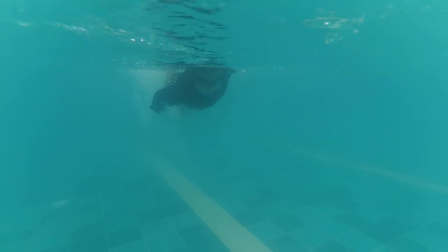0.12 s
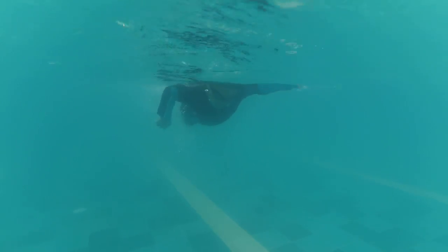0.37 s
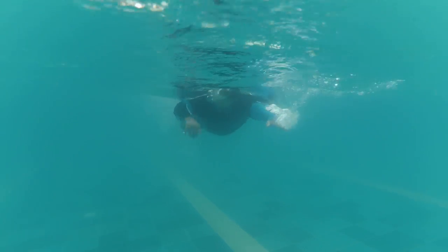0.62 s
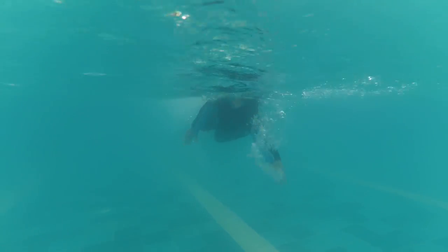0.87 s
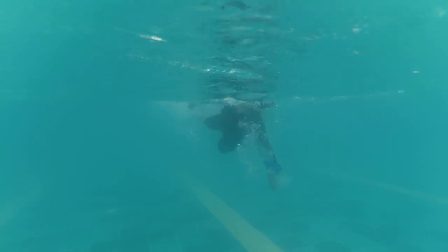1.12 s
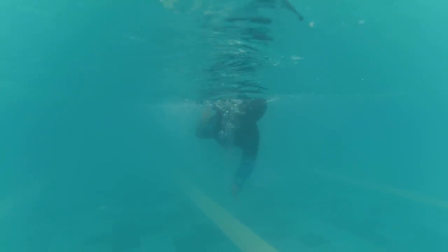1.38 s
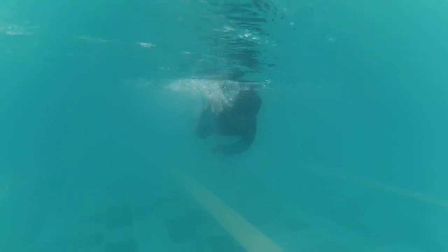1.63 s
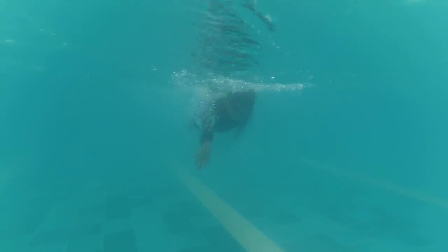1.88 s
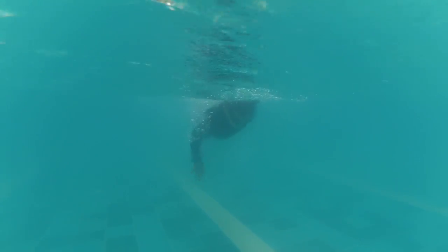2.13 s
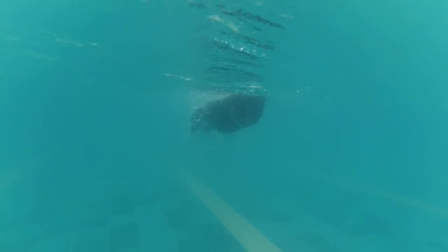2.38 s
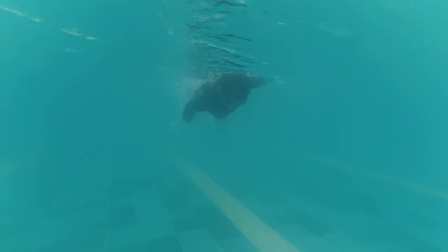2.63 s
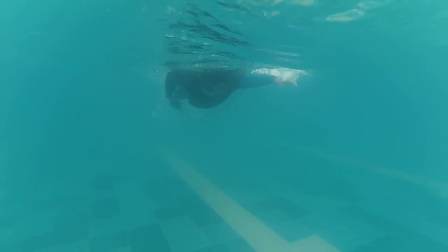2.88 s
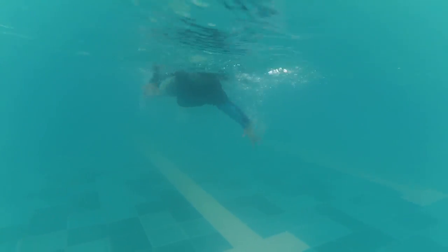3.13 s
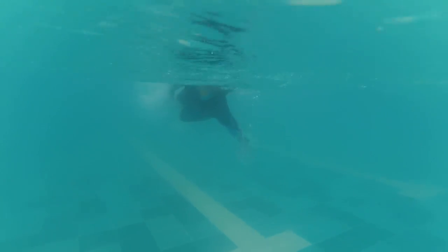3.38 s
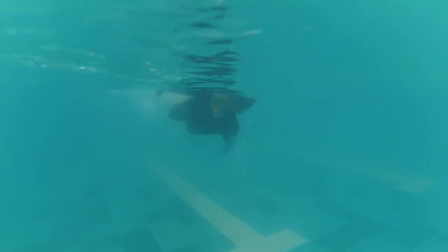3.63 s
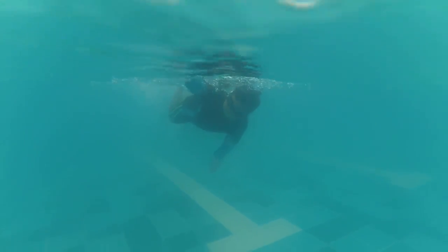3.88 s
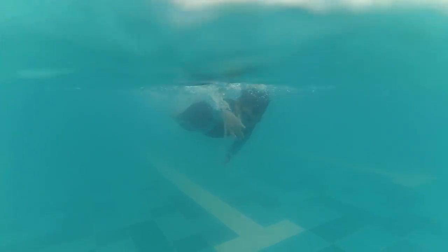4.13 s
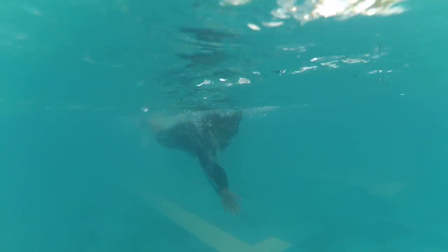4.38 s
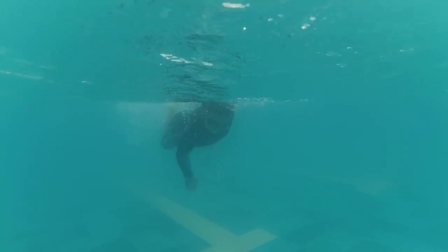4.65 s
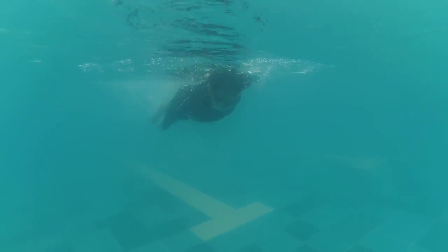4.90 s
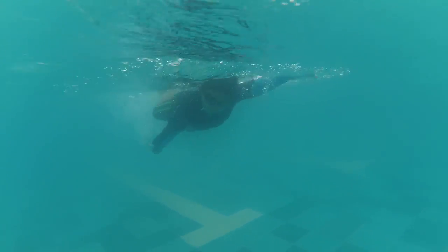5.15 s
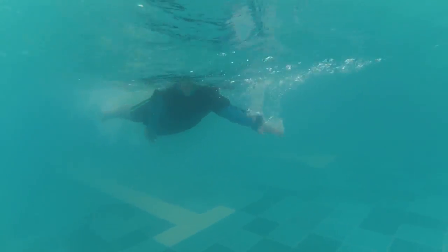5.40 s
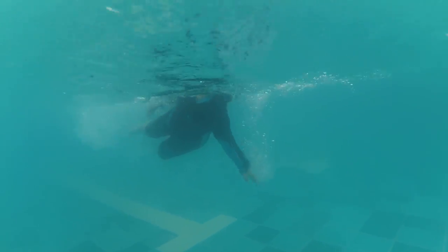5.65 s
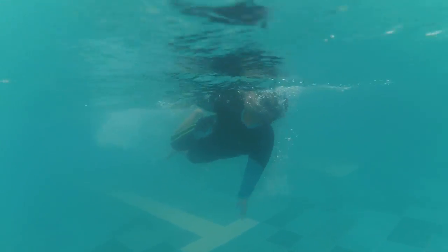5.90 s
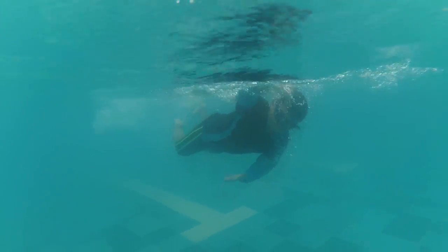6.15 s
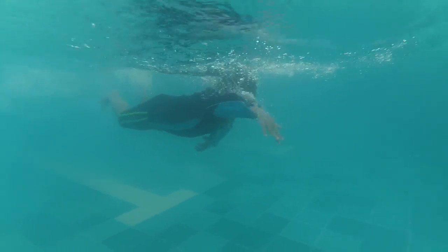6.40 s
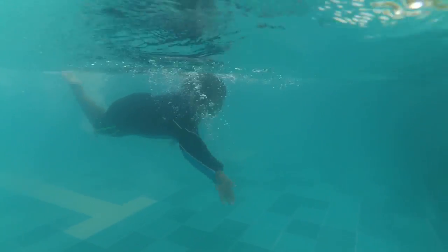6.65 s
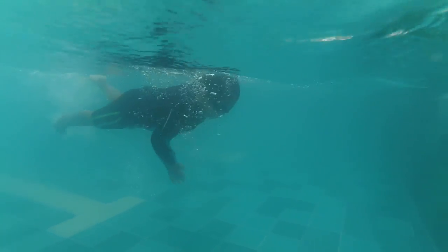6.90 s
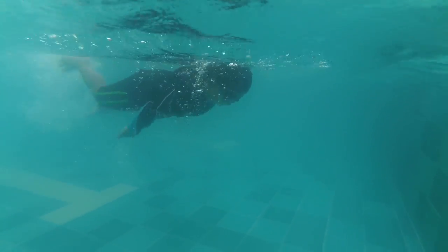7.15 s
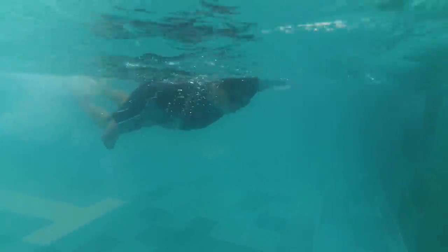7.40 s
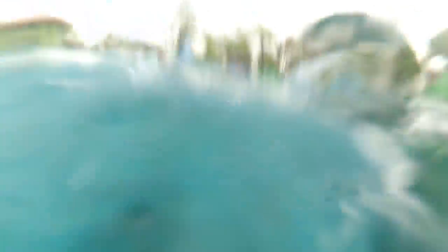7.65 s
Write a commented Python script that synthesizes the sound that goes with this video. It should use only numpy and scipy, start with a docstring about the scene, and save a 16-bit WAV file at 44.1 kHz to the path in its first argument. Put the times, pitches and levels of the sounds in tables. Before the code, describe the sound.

A swimmer passes an underwater microphone sealed in a plastic case in a pool. Dull, boxy water churning, faint hiss and low swaying rumble run throughout. Early on there are sparse clicks and small squeaks. Around the middle the churning swells, fine bubbles crackle and air glugs upward in pitch. Clicks then crowd together, a wave thumps the case, and splashes cluster before it settles to churning with occasional clicks and squeaks.

```python
"""Under water in a pool, a microphone sits in a camera's waterproof case as a swimmer passes close by.
Churned water (noise and ringing bubbles), hiss and the sway of the case run throughout.
Clicks and a few squeaks (stick-slip pulses) come early. From 3.2 s the churning swells, tiny bubbles crackle
and a leaking air pocket glugs upward in pitch. At 4.4-4.7 s clicks crowd together, a wave shoves the case
at 4.8 s, and splashes (noise puffs) crowd 5.2-5.6 s. Squeaks and clicks go on, with a faint whine at 6.9 s."""
import sys
import numpy as np
from scipy import signal
from scipy.fft import rfft, irfft
from scipy.io import wavfile
from scipy.ndimage import uniform_filter1d

SR = 44100
rng = np.random.default_rng(int(sys.argv[2]) if len(sys.argv) > 2 else 0)


def invert_db(level):
    """Linear amplitude ratio for a level in decibels (20 dB per decade), elementwise."""
    return 10 ** (np.asarray(level, dtype=float) / 20)


def waveform_to_disk(signal):
    """Save audio, clipped to [-1, 1], as 16-bit WAV at the path in sys.argv[1]."""
    frames = np.transpose(np.atleast_2d(signal))
    scaled = np.clip(frames, -1, 1) * 32767
    samples = np.round(scaled).astype(np.int16)
    wavfile.write(sys.argv[1], SR, samples)


N = 342657  # samples


def evened(x):
    """Scales a signal to an RMS of 1."""
    return x / np.sqrt(np.mean(x ** 2) + 1e-20)


def read(points, hz):
    """Reads a frequency curve, interpolated along log frequency."""
    f, value = np.transpose(points)
    return np.interp(np.log(hz + 1), np.log(f + 1), value)


def curves(table, t):
    """Reads each column of a timed table at times t."""
    s, *columns = np.transpose(table)
    return [np.interp(t, s, c) for c in columns]


def add(mix, s, sound):
    """Adds a sound to the mix from s seconds, cut at the end of the mix."""
    part = mix[round(s * SR):][:len(sound)]
    part += sound[:len(part)]


def coloured(points):
    """Noise with a given spectrum, at an RMS of 1."""
    hz = np.fft.rfftfreq(N, 1 / SR)
    return evened(irfft(rfft(rng.standard_normal(N)) * invert_db(read(points, hz)), N))


# wall resonances of the case around the microphone: (centre [Hz], width [Hz], relative level [dB])
WALL_MODES = [(640, 76, 2.1), (711, 36.6, 3.3), (830, 24, -1.5), (1060, 76, 0), (1315, 68, -5.5),
              (1604, 53, -11), (1894, 94, -8), (2032, 58, -8), (2478, 110, -7), (2720, 142, -5),
              (2980, 93, -10), (3290, 67, -6), (3920, 240, -10), (4634, 60, -20), (5550, 250, -23.5),
              (7520, 300, -23)]
# smooth base response of the wall: (frequency [Hz], relative level [dB])
WALL_BASE = [(200, -33.5), (350, -39), (900, -10), (1500, -33), (3000, -7), (3600, -44), (5000, -27.5),
             (9000, -36), (15000, -34)]


def case_response():
    """Minimum-phase wall response; unit white noise leaves it with unit power below 1.5 kHz."""
    hz = abs(np.fft.fftfreq(8192, 1 / SR))
    power = invert_db(read(WALL_BASE, hz)) ** 2
    for centre, width, db in WALL_MODES:
        power = power + invert_db(db) ** 2 / (1 + (2 * (hz - centre) / width) ** 2) ** 1.024
    log_gain = 0.5 * np.log(power / (power * (hz < 1500)).mean())
    phase = -signal.hilbert(log_gain).imag
    return np.fft.ifft(np.exp(log_gain + 1j * phase)).real[:4096]


def bubbles(per_s=900, spread_db=2.5, cycles=22):
    """Small bubbles of 36 sizes, each ringing with a slight rise; smaller ones come more often."""
    out, t = np.zeros(N), np.arange(3000) / SR
    for hz in np.geomspace(450, 12000, num=36):
        chance = per_s / 36 * hz / 2500 / SR  # per sample
        strength = invert_db(spread_db * np.minimum(rng.exponential(1, N), 4))
        births = (rng.random(N) < chance) * strength
        ring = np.sin(2 * np.pi * hz * t * (1 + 0.0026 * hz * t))
        ring *= np.exp(-t * hz * 3 / cycles) * np.minimum(t * hz / 2, 1)
        out += np.sqrt(hz) * evened(signal.oaconvolve(births, ring)[:N])  # keeps the spectrum flat
    return evened(out)


# water churned by the swimmer, before the wall: (time [s], churning level [dB], brightness [dB])
# small bubbles near the surface lift the brightness of fizz and spray
CHURNING = [(0.0, -65, 1.5), (0.71, -57, 2), (0.95, -59.5, 3.5), (1.34, -69, 1.5), (1.71, -63, 0.5),
            (1.86, -59.5, 1), (2.6, -67.5, 1), (3.35, -55, 4.5), (3.61, -52, -1.5), (3.79, -67, 5.5),
            (4.18, -63.5, 5), (4.61, -57.5, -1.5), (4.91, -60.5, 0), (5.19, -59, 2.5), (5.43, -54.5, 3.5),
            (5.93, -64.5, 3), (6.36, -61, 2.5), (7.08, -62.5, 1), (7.31, -65, 2), (7.77, -64, 6.5)]
SPRAY_FOLLOWS, FIZZ_FOLLOWS = 0.13, 0.57  # share of the churning swell, in dB, that each takes part in


def churn(patchy_db=1.5, streaky_db=2.0, flicker_db=1.5, bubble_share=0.2):
    """Broad noise and small bubbles in patches and lingering streaks; fizz and spray swell in part."""
    drive = np.sqrt(1 - bubble_share) * rng.standard_normal(N) + np.sqrt(bubble_share) * bubbles()
    hz, t, z = signal.stft(drive, SR, nperseg=512, noverlap=384)
    a, b = rng.standard_normal(z.T.shape + (2,)).T
    patches = evened(uniform_filter1d(uniform_filter1d(a, size=6, axis=0), size=12, axis=1))
    streaks = uniform_filter1d(uniform_filter1d(b, size=60, axis=1), size=60, axis=1)
    streaks = evened(streaks - uniform_filter1d(streaks, size=9, axis=0))  # neighbours trade level
    flicker = evened(uniform_filter1d(rng.standard_normal(len(t)), size=8))
    churn_db, bright_db = curves(CHURNING, t)
    follow_points = [(1300, 1), (1700, FIZZ_FOLLOWS), (4300, FIZZ_FOLLOWS), (5300, SPRAY_FOLLOWS)]
    follows = read(follow_points, hz)[:, None]
    high = read([(1300, 0), (1700, 1)], hz)[:, None]
    usual_db = np.median(churn_db)
    field_db = usual_db + follows * (churn_db - usual_db) + high * bright_db
    field_db += patchy_db * patches + streaky_db * streaks + flicker_db * flicker
    return signal.istft(z * invert_db(field_db), nperseg=512, noverlap=384)[1][:N]


# the case moving in the water: (time [s], slow sway level [dB], flow level before lumps [dB])
CASE_MOTION = [(0.05, -41, -68.5), (0.61, -40, -63), (0.77, -47, -70), (0.92, -43.5, -62), (1.39, -45, -74),
               (1.48, -39.5, -69), (2.25, -45, -69), (2.76, -39.5, -67.5), (2.91, -50, -67),
               (3.49, -34, -55), (4.11, -43.5, -69.5), (4.69, -28, -40.5), (4.73, -36, -58),
               (4.83, -18.5, -54), (5.07, -28, -60.5), (5.24, -33.5, -46), (5.37, -47, -57),
               (5.41, -34, -40.5), (5.56, -32.5, -69.5), (6.16, -29, -67), (6.2, -23, -65),
               (6.76, -33, -68.5), (7.66, -38, -67.5), (7.72, -31, -61)]
# spectra of sway, throb and buffeting: (frequency [Hz], relative level [dB])
SWAY_SPECTRUM = [(1, -5), (3, -3), (6, 0), (11, -4), (14, -10), (18, -18), (24, -40), (40, -90)]
THROB_SPECTRUM = [(10, -40), (18, -2), (22, 0), (33, -4), (45, -14), (60, -26), (100, -70)]
BUFFET_SPECTRUM = [(35, -36), (60, 6.5), (120, -1), (185, -2), (230, -13.5), (400, -18.5), (700, -42.5)]
# one wave shoves the case: (time [s], width [s], level [dB], frequency [Hz])
SHOVE = (4.832, .045, -16, 8)
# throb level [dB] at average motion, and its share of the dB swings of sway and of flow
THROB_DB, THROB_SWAY, THROB_FLOW = -53.5, 0.77, 0.18


def motion(lumpy_db=5.0):
    """Waves rock the case slowly and one shoves it; it throbs, and eddies buffet it in low lumps."""
    t = np.arange(N) / SR
    sway_db, flow_db = curves(CASE_MOTION, t)
    throb_db = THROB_DB + THROB_SWAY * (sway_db - sway_db.mean())
    throb_db += THROB_FLOW * (flow_db - flow_db.mean())
    lumps = evened(uniform_filter1d(uniform_filter1d(rng.standard_normal(N), size=2000), size=2000))
    s, width, db, hz = SHOVE
    surge = invert_db(db) * np.exp(-((t - s) / width) ** 2) * np.sin(2 * np.pi * hz * (t - s))
    rocking = invert_db(sway_db) * coloured(SWAY_SPECTRUM) + surge
    throb = invert_db(throb_db) * coloured(THROB_SPECTRUM)
    buffeting = invert_db(flow_db + lumpy_db * lumps) * coloured(BUFFET_SPECTRUM)
    return rocking + throb + buffeting


# a faint thin tone: (time [s], length [s], level [dB], start frequency [Hz], end frequency [Hz])
THIN_TONE = (6.92, .17, -72, 7750, 8060)


def whine():
    """A faint high tone that slides up and settles."""
    s, length, db, start_hz, end_hz = THIN_TONE
    out, n = np.zeros(N), round(length * SR)
    hz = end_hz + (start_hz - end_hz) * np.exp(-np.linspace(0, 5, n))
    tone = np.sin(2 * np.pi * np.cumsum(hz) / SR)
    add(out, s, invert_db(db) * np.hanning(n) ** 0.077 * tone)
    return out


# showers of tiny bubbles bursting on the case:
# (time [s], length [s], level before spread, tilt and wall [dB], rate [bursts per s])
SHOWERS = [(0.238, 0.052, -72, 130), (3.24, .32, -66.5, 700), (4.42, 0.3, -62, 660),
           (5.204, 0.056, -59, 900), (5.353, 0.19, -60, 950)]


def crackle(wall, spread_db=2.5, cycles=9, tilt=0.8):
    """Sparse bursts of uneven size ring a few cycles at one of 12 pitches, heard through the wall."""
    t, level, rate = np.arange(N) / SR, np.zeros(N), np.zeros(N)
    for s, length, db, per_s in SHOWERS:
        inside = (t > s) & (t < s + length)
        level = level + inside * invert_db(db) * np.sqrt(SR / per_s)
        rate = rate + inside * per_s
    out, u = np.zeros(N), t[:600]
    for hz in np.geomspace(1200, 8000, num=12):
        strength = invert_db(spread_db * np.minimum(rng.exponential(1, N), 3))
        births = (rng.random(N) < rate / 12 / SR) * strength
        ring = np.exp(-u * hz * 3 / cycles) * np.sin(2 * np.pi * hz * u)
        ring /= np.linalg.norm(ring)
        out += (hz / 2500) ** tilt * signal.oaconvolve(births * level, ring)[:N]
    return signal.oaconvolve(out, wall)[:N]


# wet skin squeaking on the case:
# (time [s], length [s], level after the wall [dB], slip rate [Hz], harmonic the contact favours [number])
RUBS = [(0.908, .12, -46, 812.4, 2.73), (2.238, 0.019, -57, 1070, 0.84), (2.562, 0.12, -58, 618, 3.2),
        (2.851, 0.11, -51, 651, 2.9), (5.181, 0.13, -45, 1070, 2.14), (5.258, .05, -59, 1105, 4.3),
        (5.565, 0.092, -41.5, 1110, 5.16), (6.088, 0.099, -53, 1114, 4.2), (6.492, 0.079, -55, 1067, 4)]
SLIP_SAG, SLIP_UNEVEN = 0.015, 0.016  # shares of the slip rate: fall over a squeak, random waver


def squeaks(wall, flutter_db=4.0, favour_db=9):
    """Stick-slip pulses at a wavering rate: nine fluttering harmonics coloured by the wall."""
    out, k = np.zeros(N), np.arange(1, 10)[:, None]
    noises = rng.standard_normal((len(RUBS), 10, SR // 4))
    for (s, length, db, hz, favoured), noise in zip(RUBS, noises):
        n = round(length * SR)
        wander = uniform_filter1d(noise, size=200)[:, :n] * np.sqrt(200)
        rate = hz * (1 + SLIP_SAG * np.linspace(0.5, -0.5, n) + SLIP_UNEVEN * wander[0])
        turns = np.cumsum(rate) / SR
        harmonic_db = favour_db * np.exp(-(k - favoured) ** 2) + flutter_db * wander[1:]
        slips = (invert_db(harmonic_db) * np.cos(2 * np.pi * k * turns + k ** 2)).sum(0)
        swell = np.sin(np.pi * np.linspace(0, 1, n) ** 0.5) ** 1.53
        rubbed = signal.fftconvolve(slips * swell, wall)
        add(out, s, invert_db(db) * rubbed / np.sqrt(np.sum(rubbed ** 2) / n))
    return out


# clicks that ring a bubble or the wall: (time [s], ring level [dB], ring frequency [Hz],
# ring time to -60 dB [s], crack level relative to ring, before a 5 dB cut [dB])
CLICK_EVENTS = [(0.27, -41, 5270, 0.0092, -10), (0.2793, -31.5, 2920, 0.014, -3),
                (0.3909, -41.5, 4230, .012, -11), (0.747, -44.5, 2810, 0.085, -8),
                (1.407, -43, 490, 0.019, 4.5), (1.9614, -45.5, 2070, .047, -20),
                (1.98, -51.5, 690, 0.068, -13), (2.341, -41, 583, 0.006, -6.5),
                (2.3415, -40.5, 4130, .012, -10), (2.644, -43, 735, 0.071, -27),
                (3.134, -48, 2530, .022, 0), (3.225, -42, 1410, 0.039, -12), (3.259, -43, 726, 0.0092, 1),
                (3.351, -36.5, 1160, 0.02, -39), (3.5685, -38, 1950, .026, -16),
                (3.769, -37, 1140, .022, -11), (3.7853, -39.5, 2720, .029, -13),
                (3.8034, -35, 3780, 0.02, -19), (3.9546, -42, 4120, 0.014, -10),
                (4.231, -50, 450, 0.02, 10), (4.274, -37, 1060, 0.037, 4), (4.3602, -41.5, 2500, .018, -21),
                (4.3919, -47, 2130, 0.025, -16), (4.468, -54, 7400, .0092, 2), (4.492, -47, 5840, .0089, 2),
                (4.5161, -34.5, 2960, 0.015, -4), (4.544, -27.5, 1070, 0.057, -3.5),
                (4.5653, -39, 5600, .0092, -1), (4.575, -37, 5170, .01, 0), (4.609, -38, 900, .015, -7),
                (4.618, -34, 900, 0.011, -6), (4.628, -26.5, 1000, 0.01, -25),
                (4.6418, -23.5, 2544, 0.041, -3.5), (4.649, -29, 690, .04, -12),
                (4.667, -26, 940, 0.028, -15), (4.685, -30.5, 1000, 0.016, -10),
                (4.9117, -22, 2960, 0.025, -14.5), (5.9044, -36, 2770, .031, -6.5),
                (5.9557, -41.5, 2700, 0.052, -12), (6.133, -49, 4300, 0.016, -15),
                (6.6443, -46.5, 2660, .034, -39), (6.6707, -42.5, 2850, .035, -39),
                (7.0423, -41.5, 2810, .032, -12), (7.137, -46, 684, 0.13, -22),
                (7.3108, -42, 4100, 0.012, -6), (7.3418, -49, 3250, 0.025, -4),
                (7.442, -46.5, 2720, .041, -23), (7.509, -46, 2740, 0.015, 1)]


def clicks(crack_t60=0.015, brightness=0.61):
    """A crack and one short ring for each click; low rings come with dull cracks."""
    out, t = np.zeros(N), np.arange(SR // 8) / SR
    noises = rng.standard_normal((len(CLICK_EVENTS), len(t)))
    for (s, db, hz, t60, crack_db), noise in zip(CLICK_EVENTS, noises):
        ring = invert_db(-60 * t / t60) * np.sin(2 * np.pi * hz * t) * np.minimum(t / 0.00032, 1)
        pole = np.exp(-2 * np.pi * brightness * hz / SR)  # dulls the crack above a share of the ring pitch
        crack = evened(signal.lfilter([1, -1], np.convolve([1, -pole], [1, -0.93]), noise))
        add(out, s, invert_db(db) * (ring + crack * invert_db(crack_db - 5 - 60 * t / crack_t60)))
    return out


# an air pocket shrinks as it leaks bubbles:
# (time [s], length [s], highest glug level [dB], start frequency [Hz], end frequency [Hz])
AIR_POCKET = (3.42, .36, -49, 290, 880)
POCKET_T60, STRAY_LO_HZ, STRAY_HI_HZ = 0.049, 400, 1490  # pocket's ring time [s]; stray bubbles' range


def pocket(count=14):
    """Rows of glugs: the pocket itself sounds ever higher, and each gulp sheds a stray bubble."""
    start, length, db, start_hz, end_hz = AIR_POCKET
    when, late, size, loud = rng.random((count, 4)).T
    share = (np.arange(count) + when) / count
    own_hz = start_hz * (end_hz / start_hz) ** share
    stray_hz = STRAY_LO_HZ * (STRAY_HI_HZ / STRAY_LO_HZ) ** size
    s, level_db, t60 = start + share * length, db - 6 * loud, np.full(count, POCKET_T60)
    own = list(zip(s, level_db, own_hz, t60))
    strays = list(zip(s + 0.026 * late, level_db, stray_hz, 0.43 * t60))
    return own + strays


# large bubbles and thuds: (time [s], level before rise and decay [dB], starting frequency [Hz],
# ring time to -60 dB [s])
LARGE_BUBBLES = [(0.489, -41, 148, .04), (.612, -43, 142, 0.059), (.922, -41, 640, 0.025),
                 (3.17, -40, 750, 0.032), (3.3, -47, 450, 0.036), (3.355, -45.5, 375, .05),
                 (3.386, -35.5, 281, 0.075), (3.395, -44.5, 1023, 0.075), (3.421, -34.5, 507, 0.025),
                 (3.425, -35, 1010, 0.028), (3.479, -38.5, 1016, 0.061), (3.51, -39.5, 760, .033),
                 (3.578, -36.5, 640, 0.062), (3.69, -44, 1090, .039), (3.737, -32.5, 1370, 0.013),
                 (3.737, -40.5, 1076, 0.037), (3.739, -45.5, 830, 0.091), (3.782, -46.5, 1090, 0.062),
                 (4.407, -45, 1060, 0.056), (4.459, -44, 1413, 0.037), (4.547, -43, 156, .21),
                 (4.592, -36.5, 126.4, 0.22), (4.651, -28, 133.2, 0.09), (4.691, -38, 1630, 0.026),
                 (4.897, -20, 663, 0.028), (4.897, -25, 925, 0.015), (4.915, -38, 885, 0.019),
                 (5.222, -23, 588, 0.029), (5.24, -25.5, 640, 0.036), (5.399, -29.5, 171.5, 0.18),
                 (5.401, -41, 84, .11), (5.415, -35.5, 1004, 0.061), (5.422, -29, 623, 0.06),
                 (5.563, -40, 400, 0.009)]
CLIMB = 1.08  # pitch factor per 0.1 s as a bubble rises


def glugs(rise_s=0.002, collapse=1.7):
    """Each large bubble rings, holds briefly and collapses; its pitch climbs as it nears the surface."""
    out, t = np.zeros(N), np.arange(SR // 3) / SR
    for s, db, hz, t60 in LARGE_BUBBLES + pocket():
        turns = np.cumsum(hz * CLIMB ** (t * 10)) / SR
        envelope = invert_db(db - 60 * (t / t60) ** collapse) * (1 - np.exp(-t / rise_s))
        add(out, s, envelope * np.sin(2 * np.pi * turns))
    return out


# water slapping and rushing over the case:
# (time [s], length [s], level after the wall [dB], centre [Hz], breadth [octaves])
SLAPS = [(.371, 0.04, -55, 2490, 0.82), (.514, 0.13, -63.5, 2010, 0.05), (.735, 0.081, -55, 2730, 1.2),
         (.896, 0.11, -52, 2600, 1.05), (1.137, 0.064, -52.5, 2430, 0.98), (1.149, 0.14, -67, 1613, 0.025),
         (2.875, 0.085, -56.5, 3420, 1), (3.125, 0.083, -47, 2220, 1.08), (3.41, 0.028, -52.5, 3600, 0.2),
         (4.274, .025, -54, 1520, 5.1), (4.425, 0.073, -66, 2410, 1), (4.531, .19, -58, 4540, 0.73),
         (4.603, .051, -49, 930, .63), (4.675, 0.044, -49, 1970, 5.3), (4.759, 0.027, -53.5, 3360, 0.81),
         (5.2, 0.07, -45.5, 2500, 9.2), (5.215, 0.06, -37.5, 830, 1.04), (5.225, 0.031, -44.5, 1640, 0.067),
         (5.345, 0.13, -53, 2800, 1.3), (5.355, .038, -48, 634, 0.14), (5.38, 0.17, -62.5, 5760, 0.1),
         (5.381, 0.03, -45, 1940, 0.11), (5.393, 0.096, -42.5, 790, 1), (5.446, .084, -45, 1660, 0.099),
         (5.447, 0.074, -42, 2260, 0.49), (5.57, .1, -49, 2047, 0.33), (5.895, 0.054, -58, 3740, .51),
         (7.502, 0.086, -52, 2400, 0.76), (7.508, 0.071, -49, 2920, 0.012), (7.6, .054, -59, 3230, .17),
         (7.601, .2, -63, 3300, 1.3), (7.76, 0.011, -45, 2770, 0.55)]
SPLASH_RISE = 0.14  # share of the length


def splashes(wall, grainy_db=2.5):
    """Grainy puffs of noise, each around its own centre, heard through the wall."""
    out = np.zeros(N)
    noises = rng.standard_normal((len(SLAPS), 2, SR // 4))
    for (s, length, db, centre, octaves), (noise, lumps) in zip(SLAPS, noises):
        hz = np.fft.rfftfreq(len(noise), 1 / SR)
        band = np.exp(-0.5 * (np.log2((hz + 1) / centre) / octaves) ** 2)
        n = round(length * SR)
        shape = np.interp(np.linspace(0, 1, n), [0, SPLASH_RISE, 1], [0, 1, 0]) ** 1.39
        grain = invert_db(grainy_db * evened(uniform_filter1d(lumps, size=150)))
        rush = irfft(rfft(noise) * band, len(noise)) * grain
        puff = signal.fftconvolve(rush[:n] * shape, wall)
        add(out, s, invert_db(db) * puff / np.sqrt(np.sum(puff ** 2) / n))
    return out


def scene():
    """Sums the sounds heard through the wall with those that reach the microphone directly."""
    wall = case_response()
    water = signal.oaconvolve(churn(), wall)[:N] + splashes(wall) + crackle(wall)
    return (water + motion() + clicks() + glugs() + squeaks(wall) + whine())[None]


def low_pass(x):
    """Removes everything above the highest recorded frequency."""
    return signal.sosfilt(signal.butter(12, 15620, fs=SR, output="sos"), x)


HISS_DB = -83


def record(dry):
    """Adds preamplifier hiss, as white noise, and limits the band to 15.3 kHz."""
    hissy = dry + invert_db(HISS_DB) * rng.standard_normal(dry.shape)
    edge = signal.firwin(1201, 15300, window=("kaiser", 8), fs=SR)
    return low_pass(signal.oaconvolve(hissy, edge[None], "same"))


dry = scene()
out = record(dry)
waveform_to_disk(out)
```